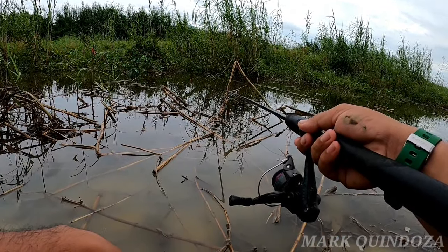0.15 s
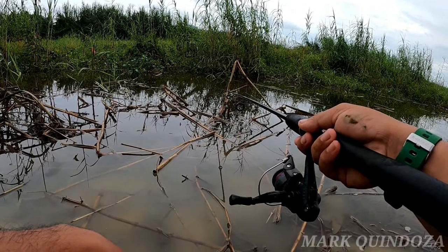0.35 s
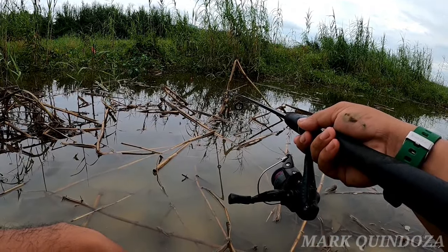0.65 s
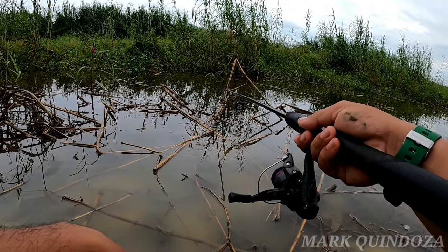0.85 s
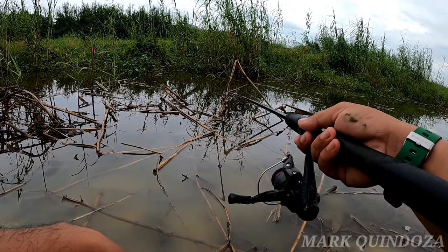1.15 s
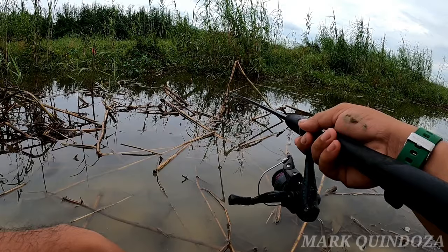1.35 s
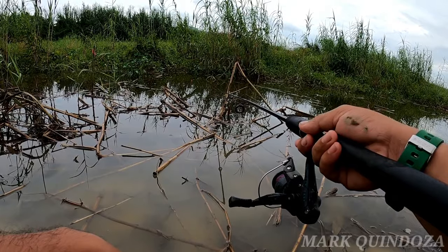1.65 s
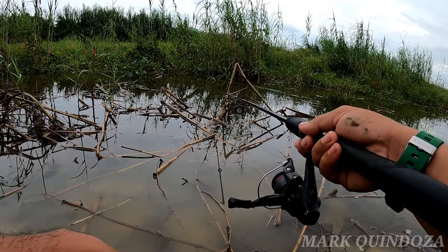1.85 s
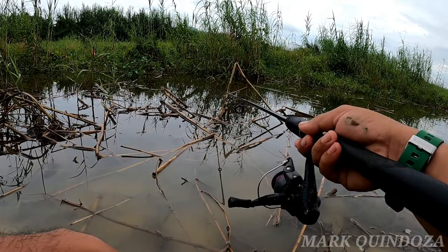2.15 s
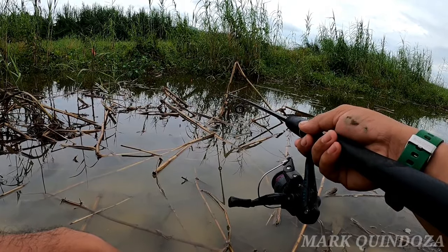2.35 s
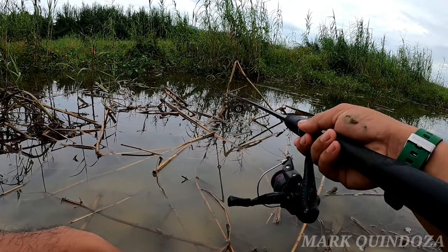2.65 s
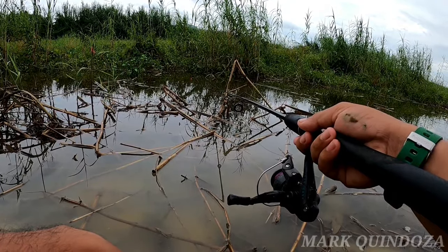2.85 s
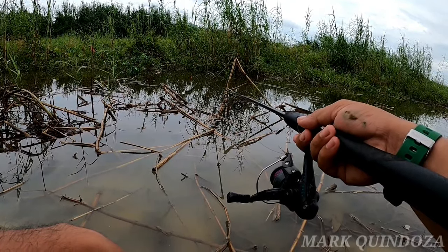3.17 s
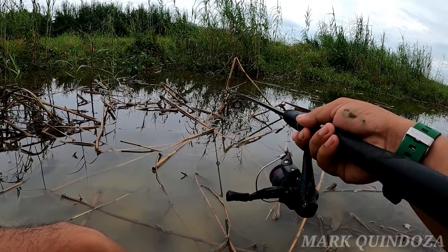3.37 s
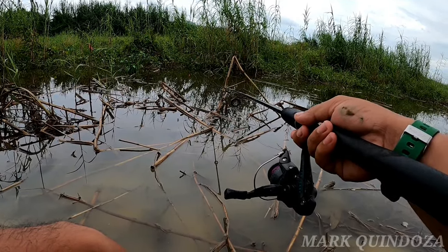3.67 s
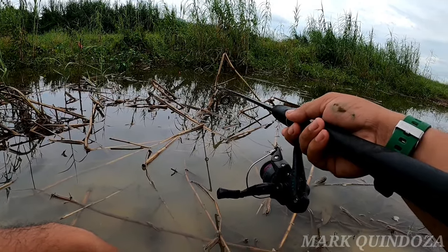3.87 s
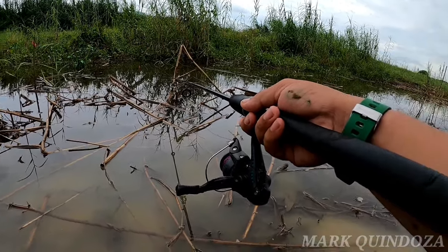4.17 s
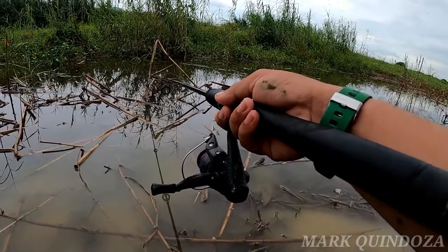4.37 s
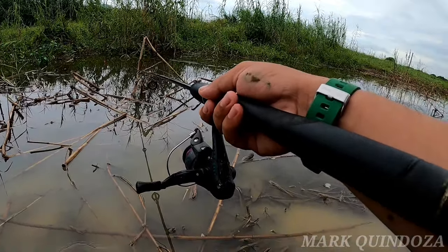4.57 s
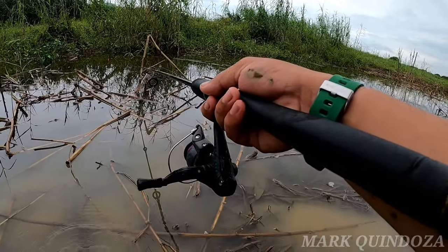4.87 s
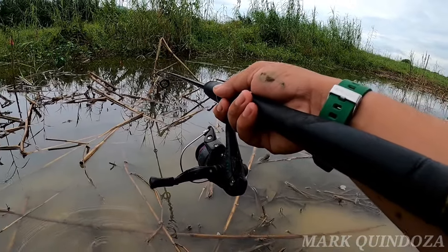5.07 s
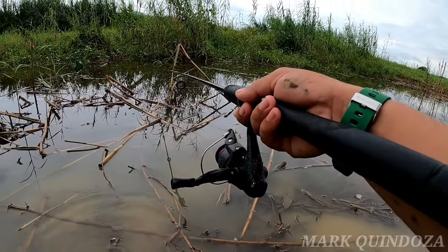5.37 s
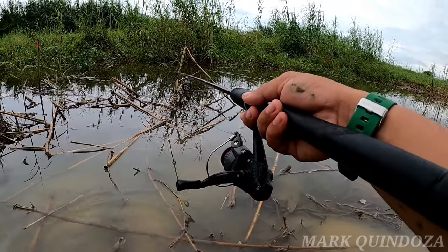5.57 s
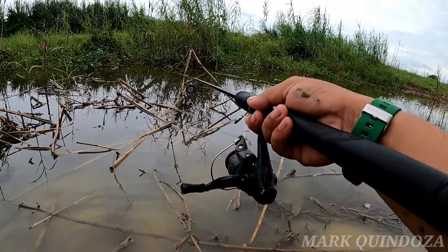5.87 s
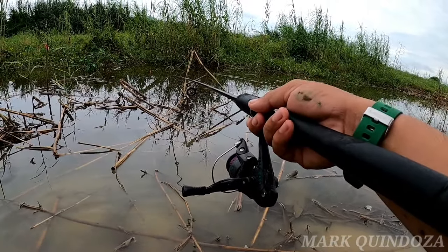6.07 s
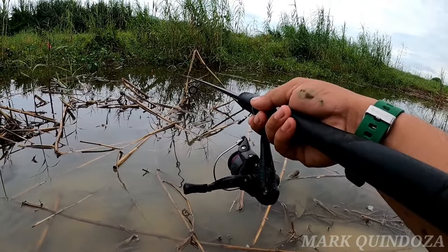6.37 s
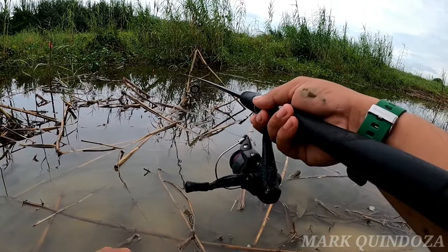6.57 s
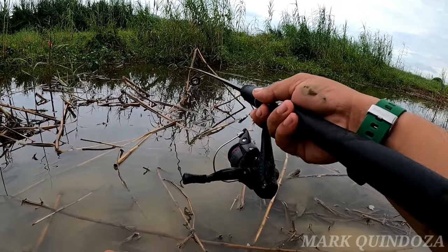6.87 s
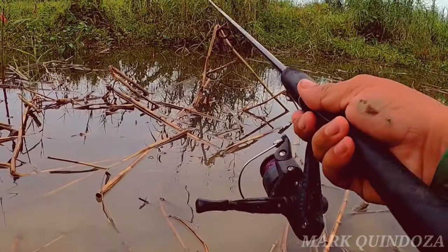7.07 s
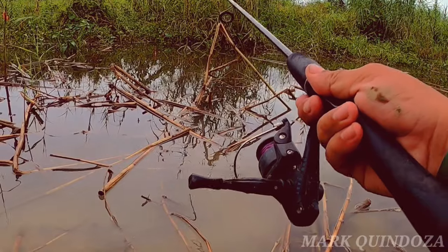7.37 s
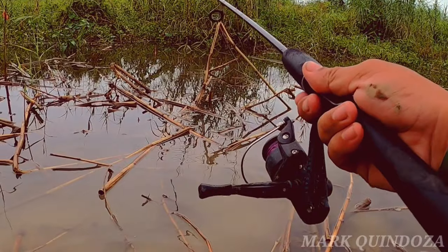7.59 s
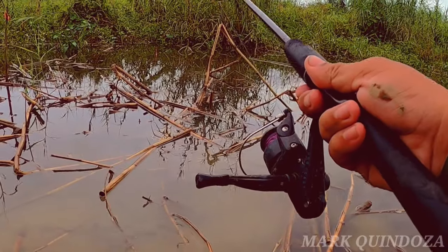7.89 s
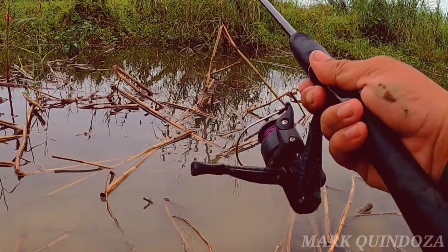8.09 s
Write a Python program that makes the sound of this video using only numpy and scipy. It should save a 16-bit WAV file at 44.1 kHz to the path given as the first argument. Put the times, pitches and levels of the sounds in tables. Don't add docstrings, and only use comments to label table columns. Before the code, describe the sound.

Steady high insect whine over deep low rumble at a pond's edge, with cricket chirps, repeated bird phrases, then sleeve rubs and light gear ticks.

```python
import sys
import numpy as np
from scipy import signal
from scipy.fft import irfft
from scipy.io import wavfile
from scipy.ndimage import uniform_filter1d

SR = 44100
rng = np.random.default_rng(int(sys.argv[2]) if len(sys.argv) > 2 else 0)


def ratio_of_db(decibels):
    return 10 ** (np.asarray(decibels, float) / 20)


def master_out(mix):
    frames = np.transpose(np.atleast_2d(mix))
    ceiling = np.clip(frames, -1, 1)
    pcm = np.round(ceiling * 32767).astype(np.int16)
    wavfile.write(sys.argv[1], SR, pcm)


N = 362943

LAG_S = .0001

# f/Hz, width/Hz, level/dB, left-right/dB
SINGERS = [
    (7015, 210, -14.5, 6.5),
    (7310, 354, -2.5, -4),
    (7546, 245, 1.5, -3.5),
    (7785, 295, -1, -3.5),
    (8030, 390, -16.5, -16),
]
# t/s, level/dB, left-right/dB
CHORUS_TURN = [(0.05, -38.5, -2.5), (0.07, -39, -2.5), (4.27, -39.5, -2.5), (4.43, -38, -1),
               (7.77, -38, -2), (8.2, -38, -1.5)]
# first t/s, end t/s, gap/s, level/dB, left-right/dB
CRICKET_BOUTS = [
    (.004, .06, .12, -49, 8),
    (.108, .65, .1211, -46, 5),
    (1.627, 3.63, .1216, -48, 7.5),
    (4.543, 6.18, .1214, -46, 3),
    (6.243, 7.05, .125, -45, 3),
    (7.888, 8.2, .126, -47, 7),
]
# t/s after its start, level/dB
WING_STROKES = [(0, -8.5), (.0165, -8.5), (.032, -7.5), (.047, -8)]
# t/s, level/dB, glide length/s
SONGS = [(0.042, -48.5, .066), (0.533, -47.5, .0625), (0.999, -47, .061), (1.468, -48.5, .061)]
# share of length, f/Hz, level/dB
GLIDE = [(0, 3500, -6), (.1, 3360, -6), (.45, 3210, -4.5), (.8, 2910, -1.5), (1, 2880, -1)]
RATTLE_S = [0, .0146, .0305, .0472, .064, .0808]
# t/s, f/Hz, level/dB
WHISTLES = [
    [(.2, 2090, -65), (.21, 2540, -46), (.222, 2700, -47.5), (.243, 2685, -47), (.258, 2400, -59),
     (.29, 2100, -78), (.32, 2230, -67), (.345, 2525, -58), (.362, 2450, -67)],
    [(.688, 1753, -68), (.703, 2570, -48), (.715, 2705, -43), (.752, 2595, -51.5), (.775, 2230, -68),
     (.805, 2240, -69), (.825, 2500, -59), (.85, 2520, -60.5), (.859, 2520, -68)],
    [(1.155, 2090, -61), (1.166, 2590, -41.5), (1.19, 2700, -51.5), (1.215, 2600, -46.5),
     (1.232, 2340, -59), (1.245, 2190, -72.5), (1.27, 2450, -58), (1.295, 2560, -47.5), (1.322, 2630, -59)],
    [(1.62, 1900, -59), (1.635, 2520, -55), (1.65, 2620, -52.5), (1.677, 2493, -54.5), (1.705, 2310, -62),
     (1.735, 2320, -61), (1.765, 2600, -54.5), (1.783, 2510, -69)],
]
# t/s, length/s, first jump/s, top f/Hz, level/dB
WARBLES = [
    (1.229, 0.11, 0.014, 4660, -62),
    (2.301, 0.14, 0.041, 4730, -50),
    (3.264, 0.13, .052, 4720, -46),
    (5.676, 0.19, 0.05, 4600, -60),
    (6.989, 0.16, 0.026, 4580, -55.5),
]
# share of length, pitch factor, level/dB
WARBLE_ARCH = [(0, .82, -9), (.08, .99, 0), (.35, 1, 0), (.6, .975, -4), (.85, .93, -6), (1, .85, -9)]
# t/s, length/s, middle f/Hz, level/dB, left-right/dB
ARCHED_NOTES = [(.763, 0.035, 3540, -54, 16), (1.557, .02, 3580, -62, 4), (2.24, .036, 4330, -58, 6),
                (3.198, 0.023, 4360, -54, 10.5), (5.614, 0.037, 4150, -63, 1.5),
                (6.153, 0.031, 2610, -61, 16), (6.436, .022, 2445, -52.5, 14),
                (6.642, .022, 2450, -51.5, 13.5), (6.922, .026, 4182, -65.5, 1.5)]
RISING_NOTES = [(.28, 0.045, 4300, -69, 9), (.482, .008, 2480, -66, 14), (.998, .018, 2800, -56.5, 9),
                (1.252, 0.031, 2810, -52, 7.5), (1.654, .008, 2730, -50.5, 11),
                (1.669, .014, 2575, -46, 12), (1.678, 0.018, 2800, -53, 13), (4.745, 0.034, 3480, -56, -1),
                (1.77, 0.059, 3750, -60.5, 7), (3.165, .03, 3600, -62, 10), (3.455, 0.034, 3730, -62.5, 12),
                (4.945, .019, 2900, -58.5, 3), (4.975, 0.018, 3360, -57, -1),
                (5.275, 0.011, 3280, -53.5, 0.5)]
FALLING_NOTES = [(1.3, 0.028, 3670, -59, 11), (1.33, 0.014, 2700, -58, 11), (1.577, 0.022, 3730, -54, 5),
                 (1.815, 0.025, 3790, -53.5, 1), (1.836, .018, 2720, -64, 9), (5.015, 0.03, 3330, -59.5, 4),
                 (5.316, .018, 3110, -60, -5), (5.575, .022, 3300, -60, 0), (6.424, 0.0099, 2690, -58, 12),
                 (7.083, 0.029, 1736, -55, 3), (7.157, 0.0098, 2040, -58, 5), (7.842, 0.016, 2950, -63, -4)]
LEVEL_NOTES = [(0, 0.092, 4050, -65, 10), (.722, 0.013, 3380, -67, 16), (.795, .014, 2450, -52, 7),
               (1.035, 0.032, 3360, -55, 12), (1.485, .04, 2490, -64, 12), (1.59, .02, 3550, -60, 10),
               (3.74, .07, 3900, -69, 14), (1.07, 0.17, 4250, -75, 11), (1.088, .036, 2920, -53, 13),
               (2.693, 0.2, 4080, -64, 8), (3.155, 0.016, 2460, -69, 20), (3.598, 0.26, 4060, -63.5, 12),
               (3.73, 0.021, 2930, -64.5, 7), (4.718, 0.02, 2810, -50, -3), (4.993, .025, 3800, -61, 0),
               (5.301, .013, 3700, -51, 0), (5.325, 0.024, 2500, -60, -1), (7.345, 0.042, 3950, -70, 0),
               (7.565, .075, 3970, -73, 0), (7.585, .03, 2850, -70, -2), (8.18, .04, 3750, -74, 2),
               (5.525, 0.021, 2510, -61, -3), (6.628, 0.027, 3792, -63, 6), (7.2, .016, 3100, -61.5, 1),
               (7.708, 0.023, 3450, -69, 0), (7.93, 0.044, 3030, -67, -1.5), (8.168, .014, 2590, -66, -4)]
# t/s, f/Hz, level/dB
CROW = [(6.2, 1271, -63), (6.24, 1276, -57), (6.276, 1320, -56), (6.444, 1433, -67), (6.482, 1422, -65),
        (6.526, 1326, -56), (6.556, 1177, -54), (6.57, 1152, -71)]
# multiple of f, level/dB at the top of the pitch
CROW_UPPER = [(2, -72), (2.5, -70.5)]
# peak t/s, peak level/dB, rise/dB per s, fall/dB per s, brightness/dB per octave
RUBS = [
    (4.261, -36, 71, 45, 0.6),
    (4.43, -37.5, 38, 80, -2),
    (4.77, -48.5, 149, 217, -1.5),
    (5.15, -60, 61, 18, -4.5),
    (5.31, -50.5, 105, 197, -4),
    (5.45, -58, 29, 43.5, -4.5),
]
# f/Hz, level/dB per Hz
CLOTH = [(350, 3), (500, 4.5), (800, -3), (1300, -2), (2000, -5), (3200, -6), (6000, -13), (9000, -26),
         (12000, -39), (15000, -58)]
# f/Hz, left-right likeness; then f/Hz, left-right/dB
CLOTH_SAME = [(1000, .77), (4000, .6), (10000, .1)]
CLOTH_LEAN = [(500, -1.5), (2900, 8.5), (6000, -.5)]
# t/s, peak level/dB, ring f/Hz, second ring f/Hz
HOLLOW_TICKS = [(3.811, -58.5, 6700, 6740), (3.989, -56, 1460, 1900), (4.651, -41, 1400, 1700),
                (4.775, -41, 1050, 1310), (4.782, -52, 1600, 1300), (4.915, -56, 1900, 2100),
                (4.835, -37.5, 5640, 5540), (4.636, -33, 1400, 2350), (4.637, -36, 4580, 4950),
                (5.382, -47.5, 1610, 2000), (5.427, -48, 1595, 2000), (5.447, -50, 1640, 1400),
                (5.479, -51, 1250, 1500), (5.49, -54, 1800, 2200), (5.277, -50, 1200, 1500),
                (5.683, -52, 1350, 1700), (5.721, -56, 1900, 2200), (5.874, -51, 1523, 1310),
                (6.553, -45, 1180, 1400)]
# t/s, peak level/dB, ring f/Hz, second ring f/Hz
SNAPPY_TICKS = [(2.787, -53.5, 2350, 2680), (3.504, -62, 4500, 5200), (4.554, -34.5, 1700, 3520),
                (4.712, -45.5, 6000, 5030), (4.88, -49.5, 2600, 4330), (4.884, -38, 1880, 2280),
                (5.145, -50, 2420, 1200), (5.205, -48.5, 2210, 1100), (5.255, -49, 1890, 3370),
                (5.297, -41, 1900, 1410), (6.23, -57, 2920, 3300), (7.23, -49, 3640, 4840),
                (7.338, -56, 2500, 3000)]
# t/s, peak level/dB
SNAPS = [(4.554, -44), (4.636, -32), (4.886, -43), (7.23, -42)]
# t/s, length/s, start f/Hz, end f/Hz, level/dB
DRONES = [(.7, 1.53, 466.8, 488, -53.5), (1.098, .91, 371.5, 384, -50), (1.907, 0.72, 619, 618, -61.5),
          (2.295, 1.5, 990, 993, -70.5), (3.2, 0.85, 477, 455, -52), (5.201, 1.2, 940, 945, -69),
          (6.198, .77, 380.3, 377, -48.5), (6.272, 0.203, 1022, 1086, -64)]
# f/Hz, level/dB per Hz
AIR = [(700, -8), (1000, 1.5), (1500, -5), (2200, -11), (3200, -12.5), (4500, -18), (5600, -6), (6500, -4),
       (8600, -2.5), (9400, -6.5), (10400, -13), (10900, -24), (15000, -61)]
# f/Hz, left-right/dB
AIR_LEAN = [(1000, -1.5), (3000, 2), (6000, 2), (8500, -8.5), (9200, -2.5), (10500, 14.5)]
# f/Hz, level/dB per Hz
RUMBLE = [(8.8, -41.5), (15, -24.5), (48, -1.5), (121, -1), (144, -2.5), (168, -5), (189, -6.5), (258, -13),
          (345, -23), (376, -24.5), (424, -29), (469, -29.5), (520, -33), (900, -47.5), (1170, -70),
          (1980, -120)]
# f/Hz, left-right likeness
FAR_SAME = [(25, .99), (70, .997), (150, .998), (300, .975), (600, .86), (1000, .6), (2000, .2),
            (4000, .03)]


def evened(x):
    return x / np.sqrt(np.mean(x ** 2) + 1e-20)


def wander(count, smooth, trim=0):
    drift = evened(uniform_filter1d(rng.standard_normal(count + 2 * trim), size=smooth))
    return drift[trim:trim + count]


def read(points, hz):
    f, value = np.transpose(points)
    return np.interp(np.log(hz + 1), np.log(f + 1), value)


def curve(rows, t):
    s, *columns = np.transpose(rows)
    return [np.interp(t, s, column) for column in columns]


def sides(lean_db):
    return ratio_of_db(np.array([lean_db / 2, -lean_db / 2]))


def place(sound, lean_db):
    return sides(lean_db)[:, None] * sound


def add(mix, s, sound):
    part = mix[:, round(s * SR):][:, :sound.shape[1]]
    part += sound[:, :part.shape[1]]


def resonate(x, hz, width):
    radius = np.exp(-np.pi * width / SR)
    a = [1, -2 * radius * np.cos(2 * np.pi * hz / SR), radius ** 2]
    return evened(signal.lfilter([1], a, signal.lfilter([1, 0, -1], a, x)))


def tone(hz, level_db, edge_s=.004, second_db=-20):
    turn = 2 * np.pi * np.cumsum(hz) / SR
    fade = signal.windows.tukey(len(hz), min(1, 2 * edge_s * SR / len(hz)))
    wave = np.sin(turn) + ratio_of_db(second_db) * np.sin(2 * turn)
    return np.sqrt(2) * ratio_of_db(level_db) * fade * wave


def at_capsules(a, b, c, d, hz, like, lag_s):
    right = a + 1j * b
    shared = like * right * np.exp(-2j * np.pi * hz * lag_s)
    return np.array([shared + np.sqrt(1 - like ** 2) * (c + 1j * d), right])


def noise(level_db, same, lean, patchy_db, lag_s=0.):
    frames, hz = N // 256 + 5, np.fft.rfftfreq(1024, 1 / SR)[:, None]
    t = np.arange(frames) * 256 / SR
    a, b, c, d, patches = rng.standard_normal((frames, 513, 5)).T
    patches = uniform_filter1d(uniform_filter1d(patches, size=10, axis=0), size=16, axis=1)
    z = at_capsules(a, b, c, d, hz, np.clip(read(same, hz), -1, 1), lag_s)
    z = z * sides(read(lean, hz)) * ratio_of_db(level_db(hz, t) + patchy_db * evened(patches))
    return signal.istft(z, nperseg=1024, noverlap=768)[1][:, :N]


def chorus():
    out, t = np.zeros((2, N)), np.arange(N) / SR
    for hz, width, db, lean_db in SINGERS:
        clicks = rng.standard_normal((N, 2)).T * (rng.random((N, 2)).T < .15)
        clicks[0, 6:] += .11 * clicks[1, :-6]
        buzz = 1 + .12 * np.sin(2 * np.pi * (rng.uniform(58, 66) * t + rng.random((2, 1))))
        drift_db = .59 * wander(N // 100 + 1, 40).repeat(100)[:N]
        out += ratio_of_db(db + drift_db) * place(resonate(clicks * buzz, hz, width), lean_db)
    level_db, lean_db = curve(CHORUS_TURN, t)
    return evened(out) * ratio_of_db(level_db + 3) * sides(lean_db + 4)


def chirps():
    rows = []
    for first, end, gap, db, lean_db in CRICKET_BOUTS:
        rows += [(s, db, lean_db) for s in np.arange(first, end, gap)]
    late, spread, sway = rng.standard_normal((len(rows), 3)).T
    return np.array(rows) + np.transpose([.002 * abs(late), .5 * spread - .88 * sway, sway])


def cricket():
    out, t = np.zeros((2, N)), np.arange(round(.012 * SR)) / SR
    for s, db, lean_db in chirps():
        for after, stroke_db in WING_STROKES:
            u, v, *grit = rng.standard_normal(2 + len(t))
            hz = 6470 * (1 + .005 * u) - 20000 * t
            ring = np.sin(2 * np.pi * np.cumsum(hz) / SR)
            scrape = .33 * resonate(np.array(grit), 7900, 1200)
            stroke = (ring + scrape) * np.hanning(len(t)) ** .36
            stroke *= ratio_of_db(db + stroke_db + .98 * v)
            add(out, s - .003 + after, place(stroke, 1.3 * lean_db + 12))
    out[1, 900:] += ratio_of_db(-5) * out[0, :-900]
    return out


def rattle(out, s, db):
    for k, after in enumerate(RATTLE_S):
        u, v, w = rng.standard_normal(3)
        sag_hz = 20 * k
        click = np.linspace(2720, 2480, round(.0066 * SR)) - sag_hz + 40 * u
        add(out, s - .001 + after, place(tone(click, db + 5 - k + 1.2 * v, .004, -30), 14))
        dip = 1928 - sag_hz + 60 * w + 420 * np.linspace(-.8, 1, round(.013 * SR)) ** 2
        add(out, s + .0044 + after, place(tone(dip, db - 17 + 1.4 * w, .0018, -2), 14))


def rasp():
    low, middle, high = rng.standard_normal((round(.13 * SR), 3)).T
    wash = .59 * resonate(low, 2080, 350) + .9 * resonate(middle, 2930, 800) + .5 * resonate(high, 3940, 1300)
    throb = 1 + .25 * np.cos(2 * np.pi * 61 * np.arange(len(wash)) / SR)
    return wash * throb * signal.windows.tukey(len(wash), .9)


def songbird():
    out = np.zeros((2, N))
    for (s, db, glide_s), whistle in zip(SONGS, WHISTLES):
        hz, level_db = curve(GLIDE, np.linspace(0, 1, round(glide_s * SR)))
        add(out, s, place(tone(hz, db + level_db, .002, -14.5), 14))
        rattle(out, s + glide_s, db)
        add(out, s + .04, place(ratio_of_db(db - 11) * rasp(), 8))
        start_s, end_s = whistle[0][0], whistle[-1][0]
        hz, level_db = curve(whistle, np.arange(start_s, end_s, 1 / SR))
        waver_db = 1.3 * wander(round(.2 * SR), 300)[:len(hz)]
        voice = tone(uniform_filter1d(hz, size=200), level_db + waver_db, .003, -34)
        add(out, start_s, place(voice, 14))
    return out


def warbler():
    out = np.zeros((2, N))
    for s, length, jump, top_hz, db in WARBLES:
        t = np.arange(round(length * SR)) / SR
        factor, level_db = curve(WARBLE_ARCH, t / length)
        sag = uniform_filter1d(.4 - ((t - jump) / .033 % 1) ** 2, size=200)
        pitch = top_hz * (factor + .068 * (sag - .2))
        level_db = db + level_db + 4 * sag + 2.7 * wander(len(t), 250)
        add(out, s, place(tone(pitch, level_db, .003, -56), 4.6))
    return out


def reed_notes(rows, start, end):
    out = np.zeros((2, N))
    bend = np.polyfit([0, .5, 1], [start, 1, end], 2)
    for s, length, hz, db, lean_db in rows:
        u = np.linspace(0, 1, round(length * SR))
        wobble = .035 * min(1, .04 / length)
        pitch = hz * np.polyval(bend, u) * (1 + wobble * wander(len(u), 110, 200))
        pitch *= 1 + .015 * u * np.sin(2 * np.pi * 70 * length * u)
        paths = uniform_filter1d(rng.standard_normal((len(u) + 400, 2)), size=220, axis=0)
        paths = 1 + .5 * evened(paths).T[:, 200:-200]
        note = tone(pitch, db - (3 + 40 * length) * u, .002, -43.5)
        add(out, s, paths * place(note, lean_db))
    return out


def crow():
    t = np.arange(CROW[0][0], CROW[-1][0], 1 / SR)
    hz, db = curve(CROW, t)
    voice = tone(hz, db + 2, .02, -67)
    dull_db = .025 * (hz.max() - hz)
    for k, k_db in CROW_UPPER:
        voice += tone(k * hz, k_db - dull_db, .05, -63)
    out = np.zeros((2, N))
    add(out, t[0], place(voice, 1.5))
    return out


def stroking(t):
    s, db, rise, fall, tilt = np.transpose(RUBS)[..., None]
    each = db - np.where(t < s, rise * (s - t), fall * (t - s))
    level_db = each.max(0) - 150 * np.maximum(4 - t, 0)
    return level_db, uniform_filter1d(tilt[each.argmax(0), 0], size=15)


def rub():
    def level_db(hz, t):
        db, tilt = stroking(t)
        colour = read(CLOTH, hz) - 40 * (hz < 350)
        bright = tilt * np.log2(np.maximum(hz, 1200) / 2200)
        return colour + db + bright - 200 * (t >= 5.7)
    hiss = noise(level_db, CLOTH_SAME, CLOTH_LEAN, 2.2)
    catches = 1 + .99 * abs(wander(N, 60)) ** .61
    return ratio_of_db(-20) * hiss * catches


def ticks(rows, high_db, wide, ring_s):
    out, t = np.zeros((2, N)), np.arange(600) / SR
    for s, db, hz, high_hz in rows:
        band = [.7 * min(hz, high_hz), 1.35 * max(hz, high_hz)]
        sos = signal.butter(2, band, "bandpass", fs=SR, output="sos")
        blow = (3 * (t == 0) + .5 * rng.standard_normal(len(t))) * np.exp(-t / .0006)
        crack = signal.sosfilt(sos, blow)
        ring = np.sin(2 * np.pi * hz * t) + ratio_of_db(high_db) * np.sin(2 * np.pi * high_hz * t)
        ring *= np.exp(-t / ring_s) * (1 - np.exp(-t / .0003))
        add(out, s, place(ratio_of_db(db + 10) * (wide * 2.8 * crack + (1 - wide) * ring), 1.8))
    return out


def snaps():
    out = np.zeros((2, N))
    sos = signal.butter(2, 5200, "highpass", fs=SR, output="sos")
    for s, db in SNAPS:
        burst = (1 + .6 * rng.standard_normal((2, 200))) * np.exp(-np.arange(200) / 3.5)
        add(out, s, ratio_of_db(db) * signal.sosfilt(sos, burst))
    return out


def reeds(x, t60):
    t = np.arange(SR // 2) / SR
    taps = rng.choice([-1., 1.], (2, len(t))) * (rng.random((2, len(t))) < 1500 / SR)
    taps = taps * ratio_of_db(-60 * t / t60) * (t > .012)
    taps /= np.linalg.norm(taps, axis=1)[:, None]
    return signal.fftconvolve(x.mean(0)[None], taps, axes=1)[:, :N]


def drones():
    out = np.zeros((2, N))
    for s, length, start_hz, end_hz, db in DRONES:
        pitch = np.linspace(start_hz, end_hz, round(length * SR))
        waver = rng.standard_normal((len(pitch), 2))
        waver = evened(uniform_filter1d(waver, size=3000, axis=0)).T
        line = tone(pitch * (1 + .0074 * waver[0]), db + 4.6 * waver[1], .2, -46)
        add(out, s, place(line, 0))
    return out


def air():
    def level_db(hz, t):
        return read(AIR, hz) - 60 * (hz < 600)
    return ratio_of_db(-53.5) * evened(noise(level_db, FAR_SAME, AIR_LEAN, 1.64, LAG_S))


def rumble():
    hz = np.fft.rfftfreq(N, 1 / SR)
    a, b, c, d = rng.standard_normal((len(hz), 4)).T
    z = at_capsules(a, b, c, d, hz, np.clip(read(FAR_SAME, hz), -1, 1), LAG_S)
    z = place(z * ratio_of_db(read(RUMBLE, hz)), -.3)
    return ratio_of_db(-21) * evened(irfft(z, N, axis=1))


def scene():
    bug, near, warble = cricket(), songbird(), warbler()
    far = reed_notes(ARCHED_NOTES, .89, .84) + reed_notes(RISING_NOTES, .89, 1.06)
    far += reed_notes(FALLING_NOTES, 1.13, .8) + reed_notes(LEVEL_NOTES, 1.01, .955) + crow()
    gear = ticks(HOLLOW_TICKS, -7.5, .03, .0016) + ticks(SNAPPY_TICKS, -4, .34, .0012) + snaps()
    echoes = ratio_of_db(-9) * reeds(near, .16) + ratio_of_db(-7) * reeds(far, .2) + ratio_of_db(-12) * reeds(gear, .1)
    echoes += ratio_of_db(-10) * reeds(warble, .55) + ratio_of_db(-7) * reeds(bug, .2)
    beds = drones() + air() + rumble()
    return chorus() + bug + near + warble + far + rub() + gear + echoes + beds


def top_cut(x):
    return signal.sosfilt(signal.butter(12, 15200, fs=SR, output="sos"), x)


def record(dry):
    b, a = signal.iirpeak(860, 5.5, SR)
    mix = dry - .54 * signal.lfilter(b, a, dry)
    n = np.arange(N)
    ends = np.clip(np.minimum(n + 300, N - n + 300) / 300, 0, 1)
    return top_cut(mix * ends)


dry = scene()
out = record(dry)
master_out(out)
```